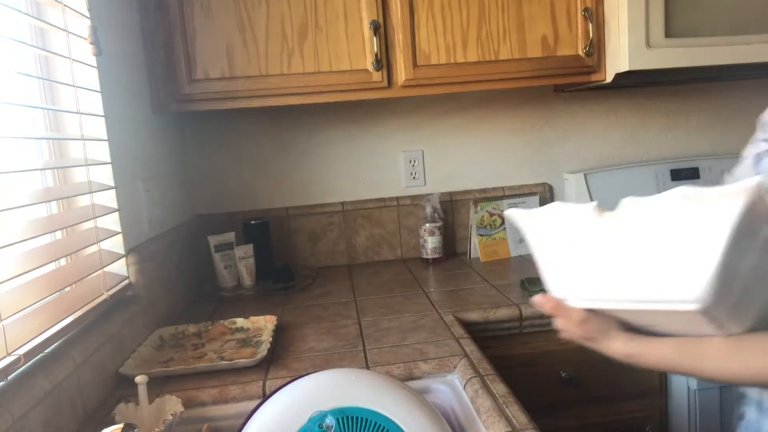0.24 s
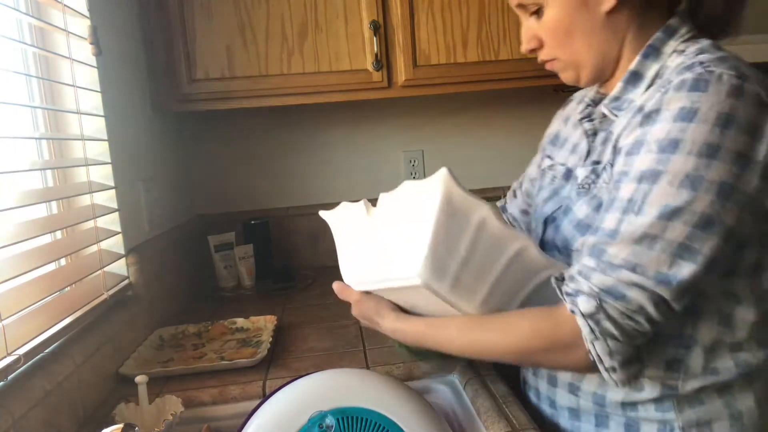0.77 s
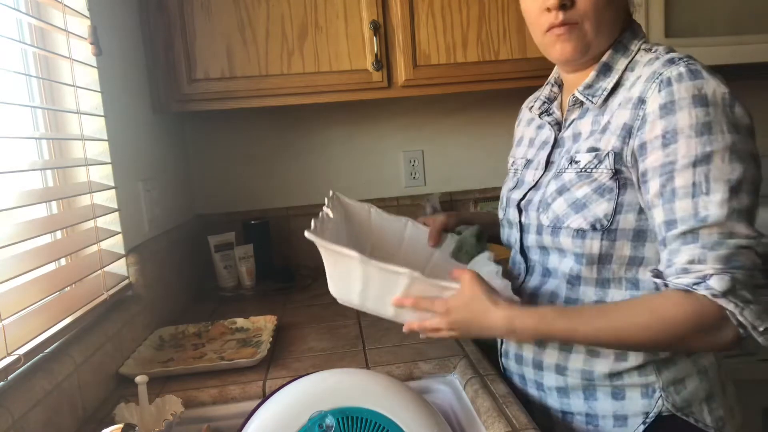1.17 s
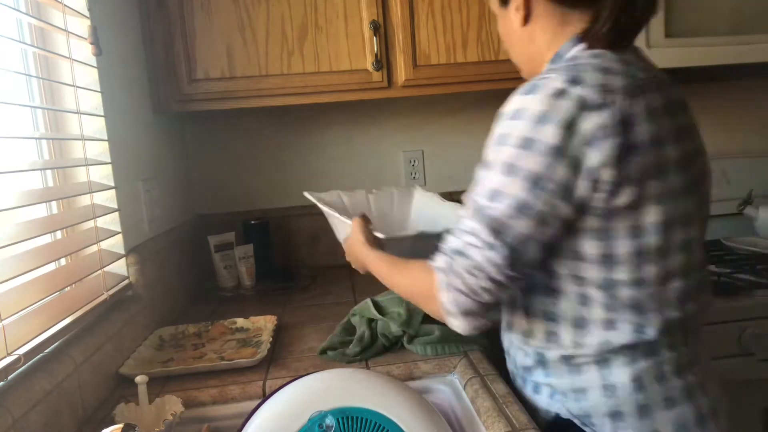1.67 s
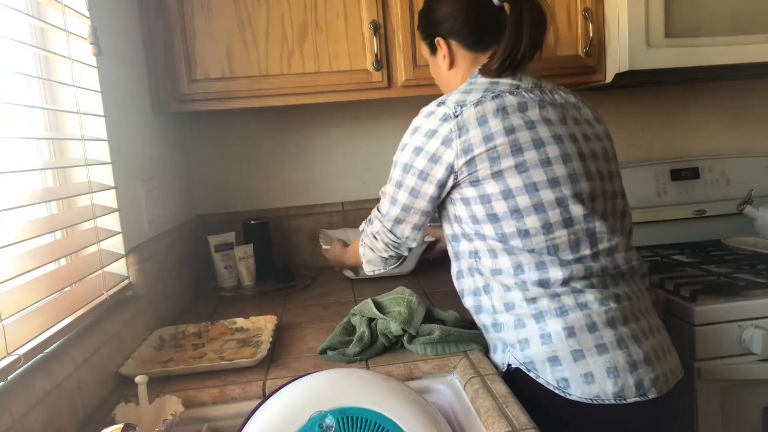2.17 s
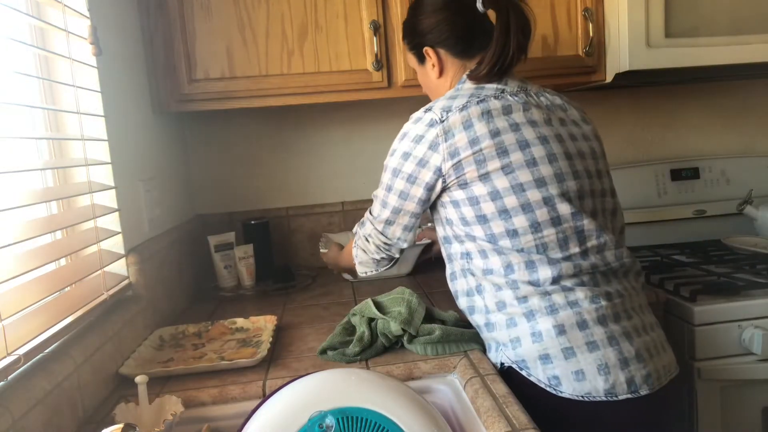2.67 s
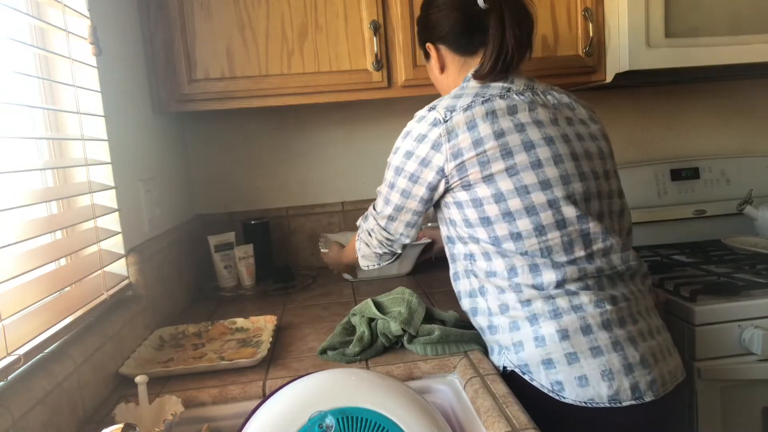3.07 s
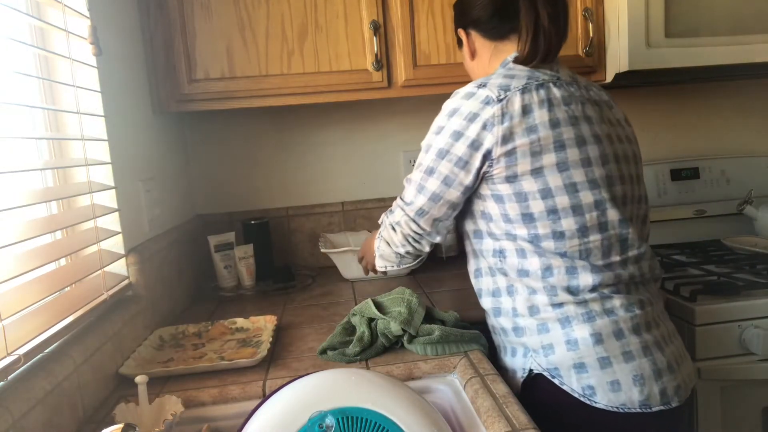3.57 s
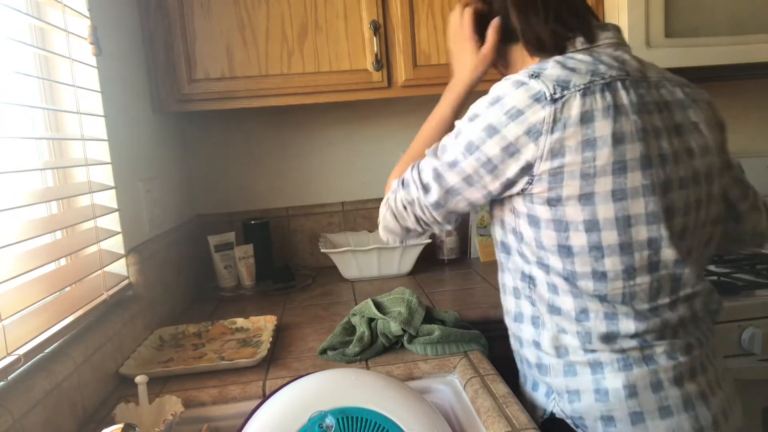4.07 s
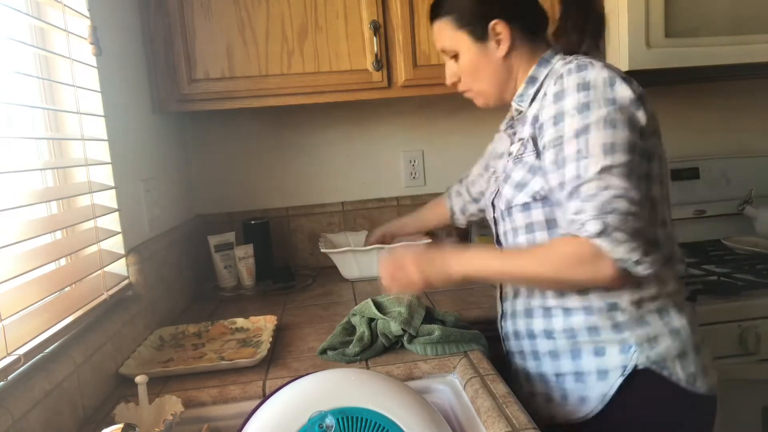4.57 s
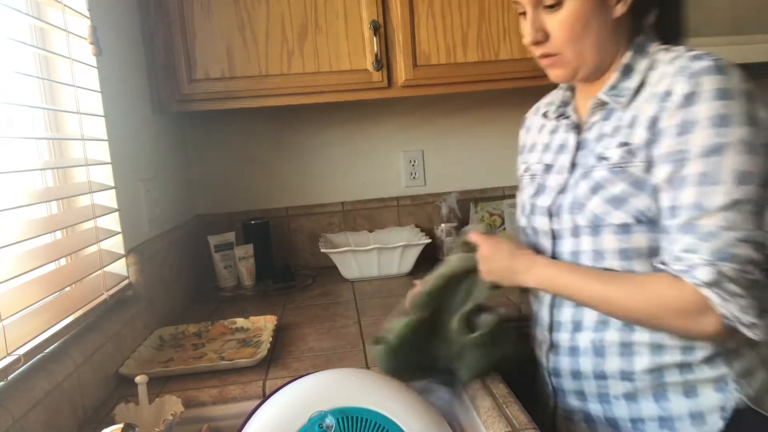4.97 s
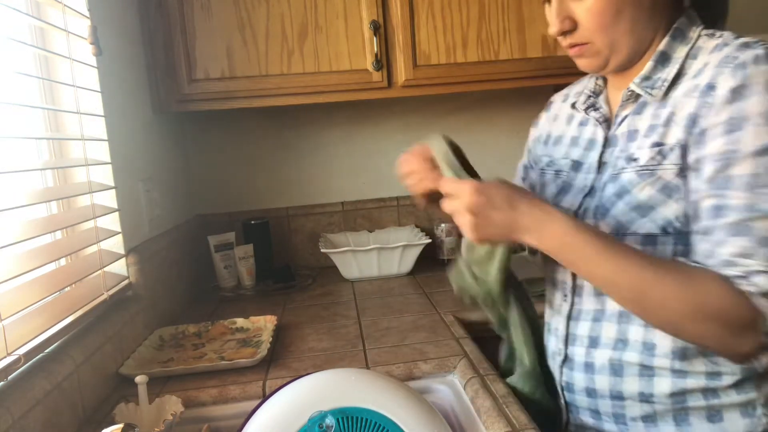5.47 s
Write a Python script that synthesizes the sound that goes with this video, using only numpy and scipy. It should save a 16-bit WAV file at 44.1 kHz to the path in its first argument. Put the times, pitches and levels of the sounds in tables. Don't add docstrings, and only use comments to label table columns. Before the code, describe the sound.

A small home kitchen with steady hiss and a low, pulsing fridge hum. Hands and cloth brush a bowl softly; a small bright metal snap and tinkle come early. The stoneware bowl then lands on a tiled counter with a hard dull knock, rocks and settles. After quieter touches, a steel utensil slides and rattles loudly on glaze, ringing briefly. A phone microphone sits about a step away.

```python
import sys
import numpy as np
from scipy import signal
from scipy.fft import rfft, irfft, next_fast_len
from scipy.io import wavfile

SR = 44100
rng = np.random.default_rng(int(sys.argv[2]) if len(sys.argv) > 2 else 0)


def ratio(d):
    e = np.asarray(d, float) / 20
    return 10 ** e


def waveform_to_disk(signal):
    frames = np.transpose(np.atleast_2d(signal))
    scaled = np.clip(frames, -1, 1) * 32767
    samples = np.round(scaled).astype(np.int16)
    wavfile.write(sys.argv[1], SR, samples)


N = 252252
TIME = np.arange(N) / SR


# f/Hz, width/Hz, level/dB
RIM_HITS = [
    (2.4112, -14, 1.04, 0.7),
    (2.4138, -23, 1.8, 3),
    (2.4275, -34, 4.7, -7.5),
    (2.4385, -33, 3, -4.5),
]
RIM_MODES = [(148, 78, -14), (226, 81, -4), (300, 20, -9.5), (515, 48, -3), (623, 26, -1.5), (733, 30, 0),
             (814, 35, -3.5), (854, 69, 0), (964, 45, -3.5), (1080, 38, 2), (1180, 79, -1), (1262, 41, 2),
             (1452, 70, -3), (1655, 50, -2), (1843, 140, -2.5), (2200, 92, 1), (2320, 100, -13),
             (2630, 65, -16), (2830, 40, -21), (3110, 100, -11.5), (3350, 81, -13), (3650, 50, -20),
             (4110, 100, -21), (4490, 83, -26), (4840, 38, -21), (5470, 140, -23), (6170, 400, -22),
             (7340, 120, -23), (8400, 90, -35)]
ROCK_HITS = [
    (2.558, -28.5, 0.59, 1),
    (2.585, -47, 1.3, -9),
]
ROCK_MODES = [(236, 55, -4), (620, 130, 1), (810, 90, 1.5), (980, 150, -1), (1164, 79, 2), (1450, 100, -14),
              (1660, 100, -11), (1920, 120, -15), (2260, 170, -7), (3250, 150, -21), (4200, 80, -23)]
FOOT_HITS = [
    (2.6188, -40, 4.7, -6),
    (2.6328, -21, 2.8, 1),
    (2.6377, -20.5, 2.2, 0),
    (2.6414, -25.5, 1.9, -3.5),
    (2.766, -49.5, 6, -3),
]
FOOT_MODES = [(232, 24, -16), (413, 68, -24), (507, 40, -3), (595, 69, -1), (816, 140, 0.5),
              (1050, 34, -14), (1395, 35, -8.5), (1670, 37, -10.5), (1790, 40, -16), (1905, 55, -12),
              (2200, 130, -9.5), (2470, 50, -29), (2780, 60, -25), (3080, 57, -17), (3210, 60, -24),
              (3370, 70, -21.5), (4040, 60, -27), (4150, 70, -31), (4240, 60, -28), (5060, 70, -30.5),
              (5500, 140, -37), (6550, 96, -32), (7700, 100, -37)]
SETTLE_HITS = [
    (2.8152, -27, 4.1, 2),
    (2.8205, -30.5, 3, 2.5),
    (2.831, -38.5, 2.3, -2.5),
]
SETTLE_MODES = [(283, 38, -8), (501, 47, 3.5), (610, 65, -6), (745, 64, -0.5), (840, 66, -5.5),
                (1010, 35, -6), (1266, 51, -14.5), (1580, 80, -13.5), (1796, 60, -12.5), (2000, 60, -22),
                (2520, 240, -25), (3150, 150, -33), (3550, 80, -33)]
PUSH_HITS = [
    (3.731, -40.5, 0.56, -1),
    (3.742, -46, 1.2, -0.5),
]
PUSH_MODES = [(102, 40, 0), (160, 82, 2.5), (600, 170, -0.5), (870, 69, -1), (1820, 200, -4.5),
              (2630, 200, -11), (3500, 200, -13), (4200, 130, -7.5), (5500, 300, -15), (7000, 500, -16.5)]


def bowl():
    rim = struck(RIM_HITS, RIM_MODES, damp_hz=30, crack_db=-13, crack_t60=0.074, wet_db=-7, scatter_db=0.1)
    rock = struck(ROCK_HITS, ROCK_MODES, damp_hz=40, crack_db=-15, crack_t60=0.029, wet_db=-2, scatter_db=1.5)
    foot = struck(FOOT_HITS, FOOT_MODES, damp_hz=45, crack_db=-9.5, crack_t60=0.099, wet_db=-10, scatter_db=-1.5)
    settle = struck(SETTLE_HITS, SETTLE_MODES, damp_hz=30, crack_db=-15, crack_t60=0.1, wet_db=-8, scatter_db=-4.5)
    push = struck(PUSH_HITS, PUSH_MODES, damp_hz=50, crack_db=-4.5, crack_t60=0.041, wet_db=-6, scatter_db=1.5)
    return rim + rock + foot + settle + push


# start t/s, attack/s, hold/s, release/s, level/dB, drift/(dB per s)
SLIDE_STROKE = (4.565, .06, .056, .004, -45, -20)
# f/Hz, width/Hz, level/dB
GRIT_MODES = [(783, 60, -7), (2600, 140, -10), (5450, 68, -2.5), (7400, 60, 3), (8500, 26, -3.5),
              (9200, 41, 1), (10270, 42, -4), (11400, 79, -1), (12000, 51.4, 1.5), (12500, 55, -2.5),
              (13200, 94, -2), (13880, 39.5, -3), (14870, 76, -6.5), (15580, 101, -9.5)]


def utensil_slide():
    swell = stroke(*SLIDE_STROKE)
    slide = rubbed(swell, resonant(GRIT_MODES, spread=8.1), grain_db=1, wet_db=-4.5)
    drag_modes = [(770, 150, 0.5), (1094, 140, -4), (1600, 100, -8), (2543, 170, -2.5)]
    drag = rubbed(swell, resonant(drag_modes, spread=0.94), grain_db=4, wet_db=-3)
    return slide + ratio(-12) * drag


# t/s, peak level/dB, tilt/(dB per octave)
STEEL_HITS = [(4.6825, -11, -3.5), (4.6866, -14, 2.5), (4.6922, -15, 0), (4.6985, -17, 2), (4.702, -17, -2),
              (4.7083, -9.5, -3.5), (4.7108, -11.5, 1.5), (4.7146, -6.5, 0.5), (4.7207, -17, 2.5),
              (4.728, -24.5, -2), (4.733, -21.5, -3.5), (4.737, -16, -2), (4.7417, -12, 2.5),
              (4.7476, -18, 1), (4.7528, -15, -2.5), (4.7577, -16.5, -3), (4.7622, -24, -1)]
# f/Hz, width/Hz, level/dB
STEEL_MODES = [(1880, 89, -18.5), (2818, 46, -2.5), (3523, 53, -12.5), (4517, 38, -12), (4993, 30, -5),
               (5220, 22, -14.5), (5860, 41, -16), (6030, 48, -14.5), (6730, 47, -7.5), (7170, 44, -11.5),
               (7330, 47, -10.5), (7670, 37, -17), (7770, 16, -17), (8260, 36.06, -20.5), (8440, 24, -16.5),
               (8865, 69, -0.5), (9600, 50, -20.5), (9960, 35, -18.5), (10450, 76, -22.5), (10680, 51, -10),
               (11000, 38, -15.5), (11240, 46, -14.5), (11520, 30, -15), (12000, 15, -14.5),
               (12200, 36.3, -5.5), (12340, 26, -7), (13100, 94, -16), (13500, 53, -20.5),
               (14400, 120, -23), (15200, 62, -15)]
# f/Hz, width/Hz, level/dB
STEEL_CLUSTERS = [(3113, 200, -13), (4670, 520, -10.5), (6740, 110, -7), (12300, 120, -12.5)]


def utensil_clatter():
    contact_ms, rattle_db, rattle_t60 = 0.95, -17, 0.06
    held = sorted((hz, width, 0.82 * db) for hz, width, db in STEEL_MODES + STEEL_CLUSTERS)
    s, db, _ = np.transpose(STEEL_HITS)[:, :, None]
    t = np.arange(s.min(), s.max() + rattle_t60, 0.0005)
    tails = (t >= s) * ratio(db + rattle_db - 60 * np.abs(t - s) / rattle_t60)
    rattle = np.transpose([t, 10 * np.log10(np.sum(tails ** 2, axis=0))])
    chatter = rubbed(rattle, resonant(held, spread=0.35), grain_db=0.5, wet_db=-7)
    clack_modes = [(800, 270, -3), (1150, 170, -3), (1670, 150, 4), (2292, 180, -2)]
    clack = rubbed(rattle, resonant(clack_modes, spread=0.66), grain_db=1.5, wet_db=-3.5)
    dust = rubbed(rattle, resonant(held, spread=3.6), grain_db=5, wet_db=-2.5)
    hits = [(s, db, contact_ms, tilt_db) for s, db, tilt_db in STEEL_HITS]
    blows = struck(hits, held, damp_hz=30, crack_db=-15.5, crack_t60=0.042, wet_db=-8.5,
                   scatter_db=2.5, jumble=0.95)
    return chatter + ratio(-8) * dust + ratio(-17.5) * clack + blows


# t/s, peak level/dB, contact time/ms, tilt/(dB per octave)
FREE_HITS = [
    (4.7085, -22, 0.9, 2.5),
    (4.7565, -30, 1.8, 4.5),
    (4.783, -32.5, 3.7, -6),
]
# f/Hz, width/Hz, level/dB
FREE_MODES = [(1880, 20, -26), (2842, 18, -3), (3030, 16, -11.5), (3300, 12, -16.5), (3433, 10, -16.5),
              (3560, 8, -9), (4447, 14, -18.5), (4510, 20, -16.5), (5100, 10, -15.5), (4953, 7, -8),
              (5235, 10, -20), (5730, 13, -8), (6100, 10, -19.5), (6721, 15.4, -11.5), (6910, 12, -14.5),
              (7180, 12, -18), (7330, 10, -7.5), (7700, 9, -10), (7485, 10, -15.5), (8878, 30, -2.5),
              (9964, 14.06, -24), (10685, 20, -12), (11570, 9, -24), (12300, 35, -12.5), (12560, 14, -13.5),
              (13000, 13.96, -20), (14310, 11.5, -30), (15110, 8, -22)]


def utensil_ring():
    return struck(FREE_HITS, FREE_MODES, damp_hz=4, crack_db=-24.5, crack_t60=0.05, wet_db=-11.5,
                  scatter_db=-1, jumble=0.98)


# f/Hz, width/Hz, level/dB
SNAP_HITS = [
    (0.8733, -32.5, 0.39, 3),
    (0.8812, -46, .6, 3),
]
SNAP_MODES = [(3270, 33, -1), (4500, 25, 4), (4780, 50, -4.5), (5500, 200, -12), (6100, 120, -4),
              (6600, 120, -5), (7140, 100, 1), (8100, 100, -2), (8400, 100, -4), (9270, 150, -7),
              (10600, 130, -4), (12650, 300, -13), (14300, 250, -13), (15300, 200, -16)]
BIT_HITS = [
    (0.9735, -46, 1.5, -4),
    (0.978, -43.5, 1.4, 3.5),
    (1.0996, -56, 1.9, -12),
    (1.201, -62, 2, -9),
]
BIT_MODES = [(3170, 24, -7), (4470, 18, -1), (5390, 33, -15), (6780, 63, -9), (8810, 50, -11),
             (9600, 36, 0), (11500, 62, -11), (13700, 40, -15), (14600, 38, -12), (15000, 34, -12)]
FLICK_HITS = [
    (3.9295, -58, .4, 1),
    (4.2432, -55, 2.6, -4),
    (4.2556, -46, 2, -1),
    (4.2588, -47.5, 1, -2),
    (4.2635, -51, 1, -1),
    (4.268, -53, 1.5, -5.5),
    (4.277, -56, 1.5, 2),
    (4.3125, -63, 1, -3),
    (4.3165, -60, 1, -3),
    (4.322, -64, 1, -4),
]
FLICK_MODES = [(1230, 290, -6), (2510, 200, -10), (3300, 200, -20), (3910, 250, -5), (4880, 180, -7),
               (6500, 250, -11), (7300, 250, -10), (8700, 160, -7), (11000, 120, -6), (12200, 120, -14),
               (13400, 150, -8), (13900, 130, -10), (14900, 160, -12)]
# start t/s, attack/s, hold/s, release/s, level/dB, drift/(dB per s)
JINGLE_STROKE = (.868, .015, .2, .12, -62, -20)
# f/Hz, level/(dB per Hz)
JINGLE_TONE = [(1470, -40), (2500, -9), (3180, -5), (3910, -13), (4490, -10), (4930, -7), (9350, -12),
               (15800, -11)]


def metal_bits():
    snap = struck(SNAP_HITS, SNAP_MODES, damp_hz=15, crack_db=-11, crack_t60=0.07, wet_db=-10, scatter_db=1.5)
    tinkle = struck(BIT_HITS, BIT_MODES, damp_hz=8, crack_db=-10, crack_t60=0.06, wet_db=-7, scatter_db=1.5)
    flick = struck(FLICK_HITS, FLICK_MODES, damp_hz=90, crack_db=-3, crack_t60=0.051, wet_db=-9,
                   scatter_db=2.5, jumble=0.92)
    swell = stroke(*JINGLE_STROKE)
    shimmer = rubbed(swell, resonant(BIT_MODES, spread=1.4), grain_db=10, wet_db=-13)
    jingle = rubbed(swell, lambda f: ratio(along(JINGLE_TONE, f)), grain_db=3.5, wet_db=-14)
    return snap + tinkle + flick + ratio(-26) * shimmer + jingle


# t/s, peak level/dB, contact time/ms, tilt/(dB per octave)
PALM_HITS = [
    (0.934, -53, 4.7, -2),
    (1.212, -53, 4.7, -3),
    (1.425, -54, 1.6, -7),
    (1.468, -48.5, 4.7, -2),
    (3.818, -52.5, 4.2, -6),
]
# f/Hz, width/Hz, level/dB
PALM_MODES = [(113, 12, -14), (261, 54, -7), (377, 33, -12.5), (1290, 60, -20.5), (1950, 90, -24),
              (2350, 82, -29)]


def palm():
    return struck(PALM_HITS, PALM_MODES, damp_hz=49, crack_db=4, crack_t60=0.074, wet_db=-5, scatter_db=1.5)


# t/s, peak level/dB, centre f/Hz, t60/s
BRUSHES = [(.01, -66, 5700, 1), (0.451, -56, 2130, 0.11), (1.03, -64, 6500, 0.41),
           (1.097, -56, 6500, 0.056), (.975, -52, 11000, .08), (1.215, -63, 8000, 0.041),
           (1.55, -59.5, 5460, 0.073), (1.668, -63, 6000, 0.018), (1.697, -62.5, 5500, 0.037),
           (2.215, -64, 4500, 0.082), (2.24, -62.5, 2800, 0.074), (2.635, -49.5, 7950, 0.059),
           (2.807, -57.5, 7000, 0.2), (3.79, -63, 12000, 0.13), (3.93, -52, 7000, 0.022),
           (4.256, -52, 3500, 0.055), (4.312, -57, 4580, 0.071), (5.25, -61.5, 8800, 0.45)]
# t/s, peak level/dB, centre f/Hz
PINGS = [(.82, -63, 4250), (.94, -53, 11100), (.95, -57, 10900), (.9, -62, 13500), (.91, -62, 6800),
         (.94, -55, 15000), (.942, -59, 8700), (1.0, -59.5, 1880), (1.022, -59, 11500), (1.055, -67, 10800),
         (1.212, -61, 2790), (1.325, -67, 2780), (2.586, -64, 4200), (3.162, -63, 3500), (3.162, -61, 6800),
         (3.42, -59.5, 8440), (5.079, -61, 8770), (5.079, -66, 9880), (5.079, -63, 11000),
         (3.861, -59, 301), (4.245, -60, 3160), (4.312, -69, 8500), (.88, -67, 4490), (1.1, -57, 8850),
         (1.1, -65, 7350), (1.1, -62, 6000)]


def touches():
    mix, t = np.zeros(N + SR), np.arange(SR // 2) / SR
    events = []
    for s, db, hz, t60 in BRUSHES:
        rise = min(0.0032 * (10 * t60) ** 2.3, 0.035)
        events.append((s, db, hz, 0.7, rise, t60))
    for s, db, hz in PINGS:
        events.append((s, db, hz, 0.054, 0.0021, 0.071 * (hz / 4000) ** -0.6))
    for s, db, hz, octaves, rise, t60 in events:
        puff = noise(len(t), lambda f: np.exp(-0.5 * (np.log2((f + 1) / hz) / octaves) ** 2))
        envelope = ratio(db - 60 * t / t60) * (1 - np.exp(-t / rise))
        add(mix, s, envelope * puff, wet_db=-10)
    return mix[:N]


def squeak():
    u = np.clip((TIME - 2.219) / 0.066, 0, 1)
    phase = 2 * np.pi * np.cumsum(228 + 30 * u ** 3) / SR
    tone = np.sin(phase) + 0.072 * np.sin(2 * phase) + 0.076 * np.sin(3 * phase + 0.9)
    grip_db = 2 * noise(N, lambda f: f < 90)
    return ratio(-45 + grip_db) * np.abs(np.sin(np.pi * u)) ** 0.54 * tone


def swipe():
    u = np.clip((TIME - 4.8) / 0.018, 0, 1)
    carrier = np.sin(2 * np.pi * np.cumsum(4900 - 1390 * u) / SR)
    hiss = noise(N, lambda f: f < 800) * carrier
    return ratio(-52) * np.abs(np.sin(np.pi * u)) ** 0.5 * hiss


# f/Hz, level/dB, partner level/dB, throbs per compressor throb
HUM = [
    (240.3, -63, -71, 1),
    (116.7, -84, -78, 0.3),
]
# f/Hz, level/dB
WHINE = [(689.1, -81), (1405, -83), (1637, -90), (3068, -86), (3424, -87), (3892, -88), (6842, -94),
         (8850, -94), (10325, -98), (10853, -96)]


def fridge():
    loaded = np.maximum(TIME - 2.9, 0)
    throb = 2 * np.pi * (5.96 * (TIME - 0.07) - 0.32 * loaded ** 2 / 2)
    sound = np.zeros(N)
    for hz, db, partner_db, share in HUM:
        phase = 2 * np.pi * hz * TIME
        sound += ratio(db - 3) * np.sin(phase) + ratio(partner_db + 5) * np.sin(phase - share * throb)
    for hz, db in WHINE:
        waver_db = 2 * noise(N, lambda f: f < 5)
        sound += ratio(db + 3.5 + waver_db) * np.sin(2 * np.pi * hz * TIME)
    drone = np.sin(2 * np.pi * 102.8 * TIME) * np.cos(np.pi * 3.2 * (TIME - 5.07))
    return sound + ratio(-75.5 + 3 * loaded) * drone


# f/Hz, level/(dB per Hz)
HISS = [(30, -37.5), (60, -8.5), (103, -12.5), (200, -8.5), (300, -11), (360, -12), (600, -15.5),
        (980, -16.5), (1380, -18.5), (1520, -20.5), (3030, -24), (6000, -29), (11000, -29), (15800, -34.5)]
# f/Hz, width/Hz, level/dB
AIR = [(300, 9, 4), (388, 16, 3), (598.6, 48, 6.5), (689, 16, 5.5), (840, 43, 3), (1036, 12, -6),
       (1343, 55, 3.5), (1510, 52, -3), (3800, 100, -3.5), (4640, 120, -1.5), (6800, 103, 2.5),
       (9640, 670, -4)]


def room():
    def bumps(f):
        return sum(db / (1 + ((f - hz) / width) ** 2) for hz, width, db in AIR)
    rush = noise(N, lambda f: ratio(along(HISS, f) + bumps(f)))
    sway_db = 0.5 * noise(N, lambda f: f < 6)
    return ratio(-61.5 + sway_db) * rush


def struck(hits, modes, damp_hz, crack_db, crack_t60, wet_db, scatter_db, jumble=0):
    mix, t = np.zeros(N + SR), np.arange(SR // 4) / SR
    hz, width, mode_db = np.transpose(modes)[:, :, None]
    width = np.hypot(width, damp_hz)
    sign = (-1) ** np.arange(len(hz))[:, None]
    for s, db, contact_ms, tilt_db in hits:
        scatter = scatter_db * rng.standard_normal(hz.shape)
        size = ratio(mode_db + tilt_db * np.log2(hz / 2000) + scatter) * width
        start = jumble * 2 * np.pi * rng.random(hz.shape)
        rings = np.exp(-np.pi * width * t) * np.sin(2 * np.pi * hz * t + start)
        body = np.sum(sign * size * rings, axis=0)

        def colour(f):
            return np.sqrt(np.sum((size / width / (1 + ((f - hz) / (0.08 * hz)) ** 2)) ** 2, axis=0))
        crack = ratio(crack_db - 60 * t / crack_t60) * noise(len(t), colour)
        rise = (1 - np.exp(-2000 * t / contact_ms)) ** 2
        add(mix, s, ratio(db) * rise * (body / np.abs(body * rise).max() + crack), wet_db)
    return mix[:N]


def rubbed(rows, gain, grain_db, wet_db):
    s, db = np.transpose(rows)
    t = s[0] + np.arange(round((s[-1] - s[0]) * SR)) / SR
    grain = ratio(grain_db * noise(len(t), lambda f: f < 500))
    friction = unit(grain * noise(len(t), gain))
    mix = np.zeros(N + SR)
    add(mix, s[0], ratio(np.interp(t, s, db)) * friction, wet_db)
    return mix[:N]


def resonant(modes, spread):
    def gain(f):
        return np.sqrt(sum(ratio(db) ** 2 / (1 + ((f - hz) / (spread * width)) ** 2) ** 2
                           for hz, width, db in modes))
    return gain


def stroke(start, attack, hold, release, db, drift_db):
    end_db, depth_db = db + drift_db * hold, 30
    corners = start + np.cumsum([0, attack, hold, release])
    return np.transpose([corners, [db - depth_db, db, end_db, end_db - depth_db]])


# f/Hz, t60/s
KITCHEN = [(200, 0.23), (1000, 0.19), (1900, .2), (2300, 0.17), (2800, 0.24), (4000, 0.22), (12000, 0.2)]


def add(mix, s, sound, wet_db):
    hz, t, z = signal.stft(rng.standard_normal(SR // 3), SR, nperseg=256)
    decay = ratio(-60 * t / along(KITCHEN, hz)[:, None])
    tail = signal.istft(z / np.abs(z) * decay, SR, nperseg=256)[1]
    answer = np.pad(tail / np.linalg.norm(tail), (round(0.004 * SR), 0))
    wet = signal.fftconvolve(sound, answer)
    at = round(s * SR)
    mix[at:at + len(sound)] += sound
    mix[at:at + len(wet)] += ratio(wet_db) * wet


def noise(count, gain):
    size = next_fast_len(count)
    spectrum = rfft(rng.standard_normal(size)) * gain(np.fft.rfftfreq(size, 1 / SR))
    return unit(irfft(spectrum, size)[:count])


def unit(x):
    return x / np.sqrt(np.mean(x ** 2) + 1e-20)


def along(points, hz):
    f, v = np.transpose(points)
    return np.interp(np.log(hz + 1), np.log(f + 1), v)


def scene():
    utensil = utensil_slide() + utensil_clatter() + utensil_ring()
    hands = palm() + touches() + squeak() + swipe()
    return (bowl() + utensil + metal_bits() + hands + fridge() + room())[None]


def band_limit(x):
    return signal.sosfilt(signal.butter(12, 16790, fs=SR, output="sos"), x)


# lower f/Hz, upper f/Hz
MIC_HZ = (85, 15720)


def record(dry):
    low_cut = signal.butter(N=6, Wn=MIC_HZ[0], btype="high", fs=SR, output="sos")
    top_cut = signal.ellip(N=10, rp=0.5, rs=60, Wn=MIC_HZ[1], fs=SR, output="sos")
    mix = signal.sosfilt(np.vstack([low_cut, top_cut]), dry)
    return band_limit(mix)


dry = scene()
out = record(dry)
waveform_to_disk(out)
```